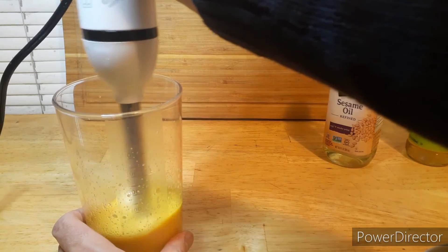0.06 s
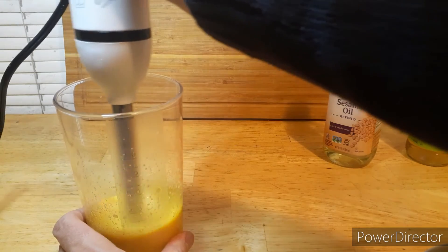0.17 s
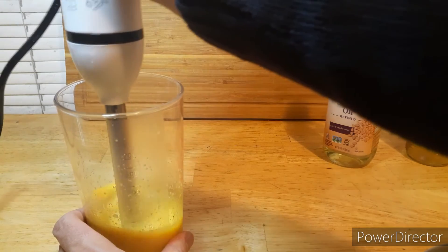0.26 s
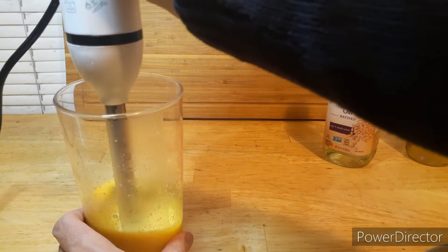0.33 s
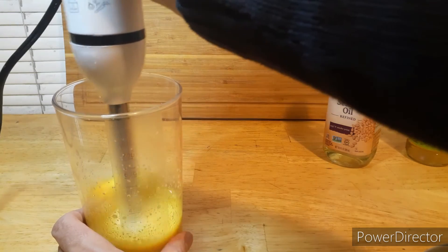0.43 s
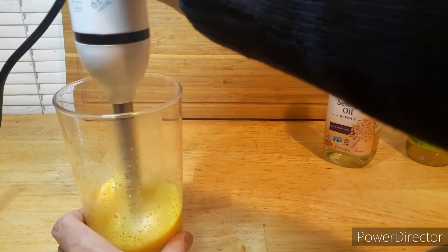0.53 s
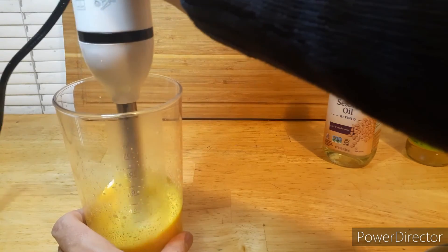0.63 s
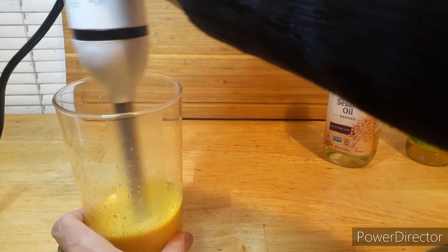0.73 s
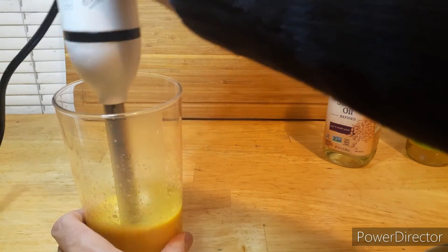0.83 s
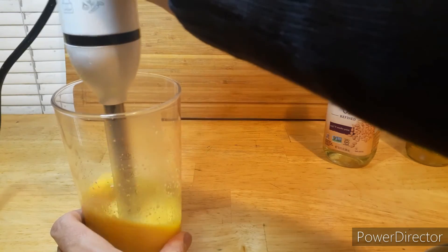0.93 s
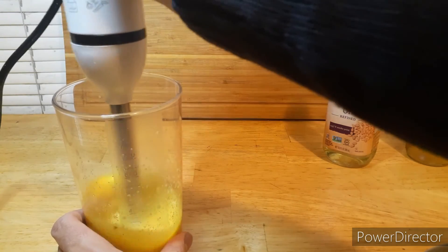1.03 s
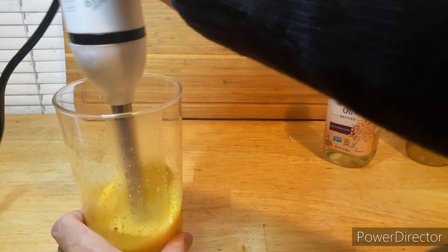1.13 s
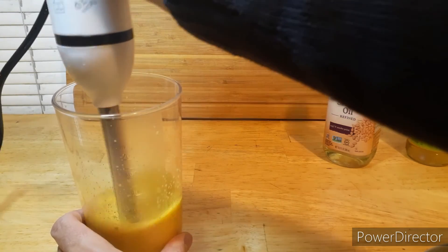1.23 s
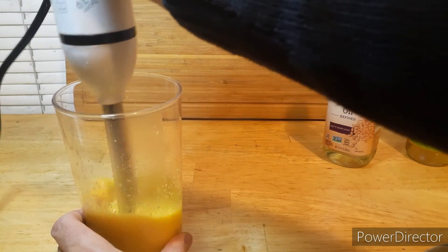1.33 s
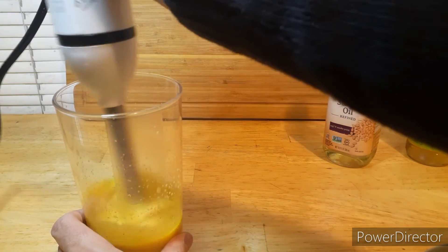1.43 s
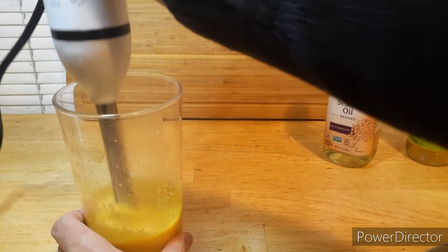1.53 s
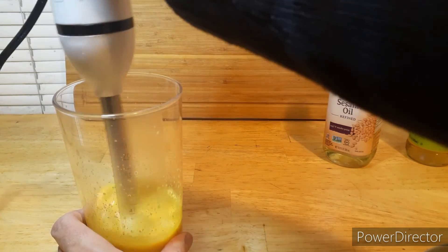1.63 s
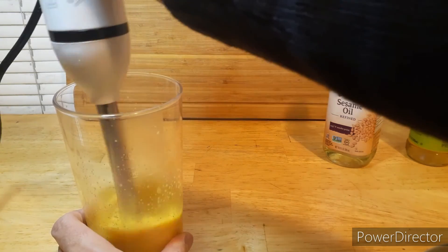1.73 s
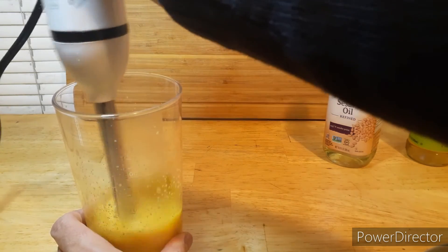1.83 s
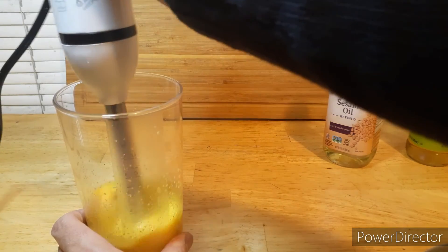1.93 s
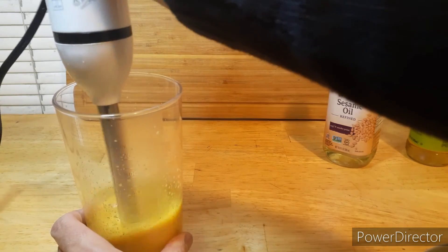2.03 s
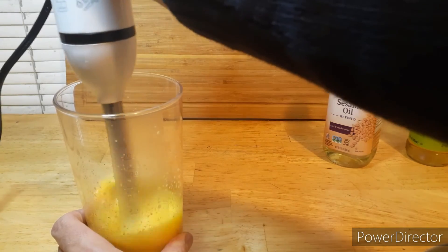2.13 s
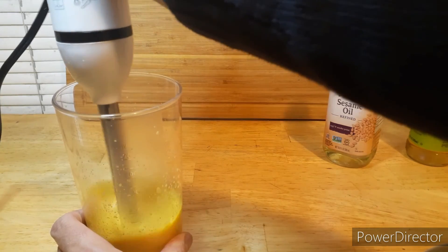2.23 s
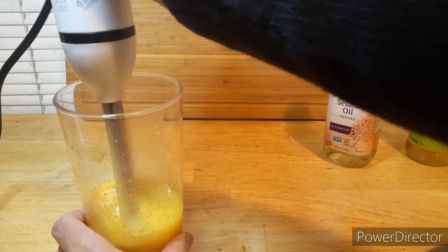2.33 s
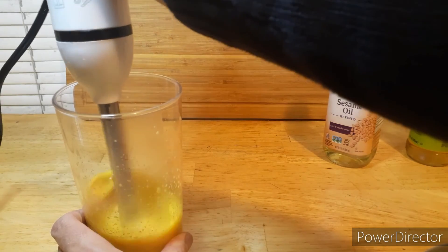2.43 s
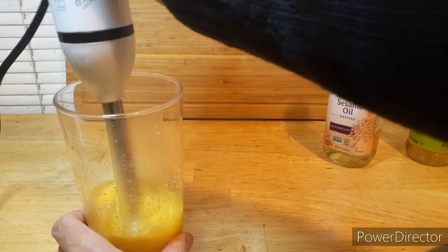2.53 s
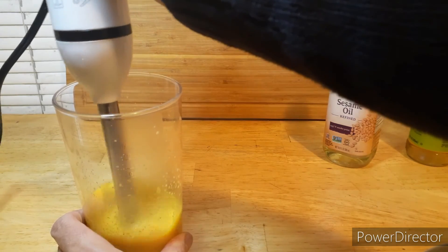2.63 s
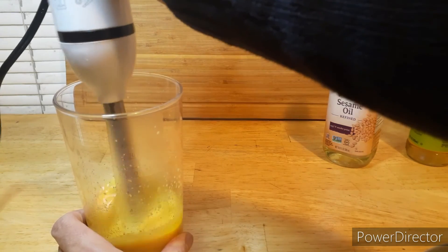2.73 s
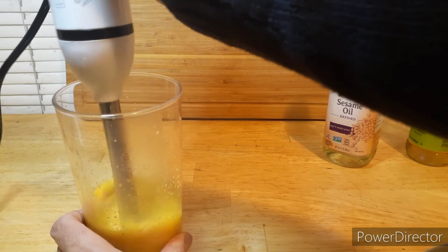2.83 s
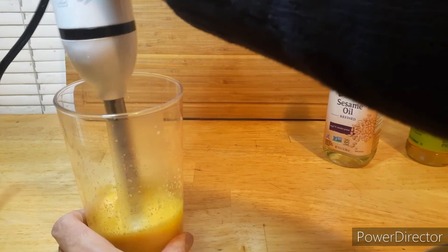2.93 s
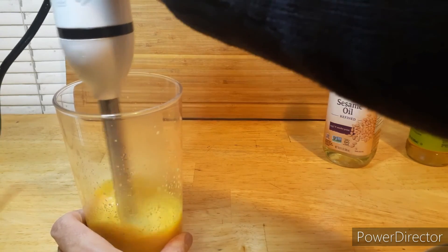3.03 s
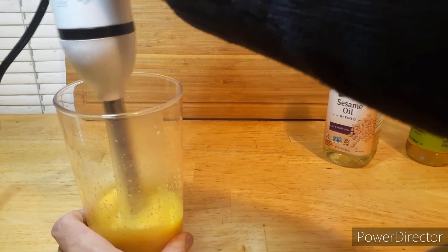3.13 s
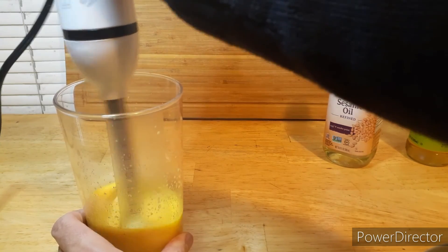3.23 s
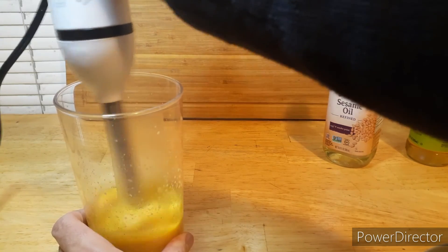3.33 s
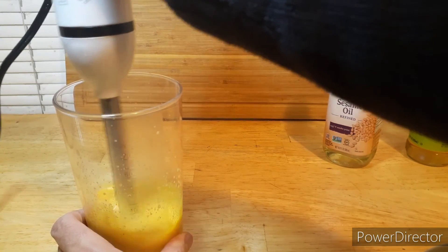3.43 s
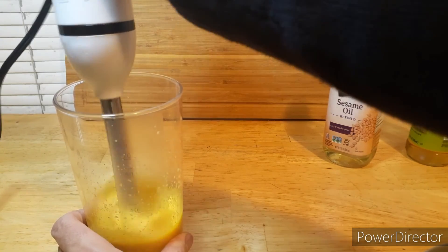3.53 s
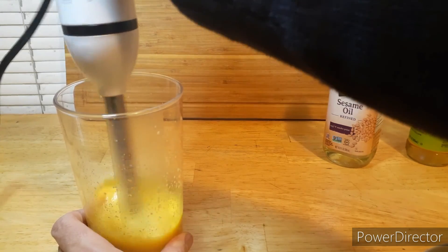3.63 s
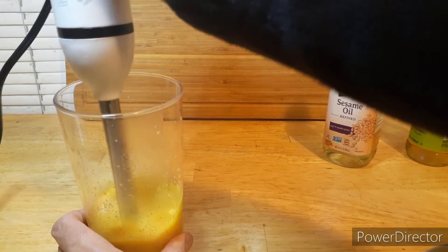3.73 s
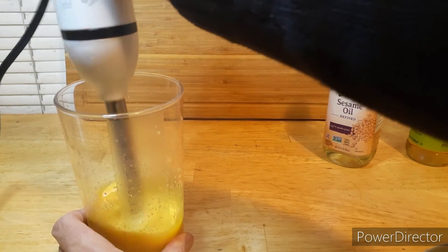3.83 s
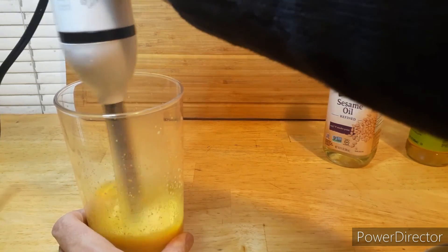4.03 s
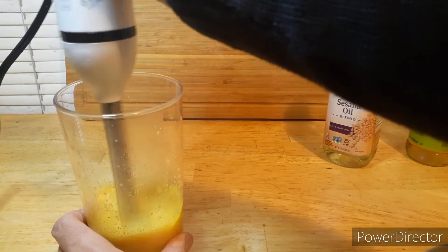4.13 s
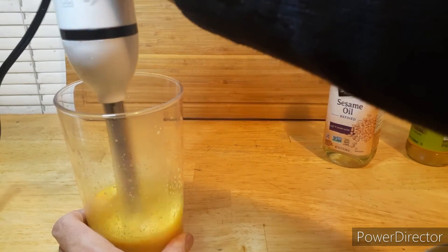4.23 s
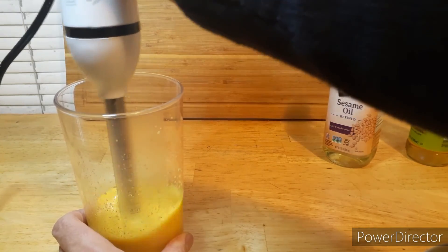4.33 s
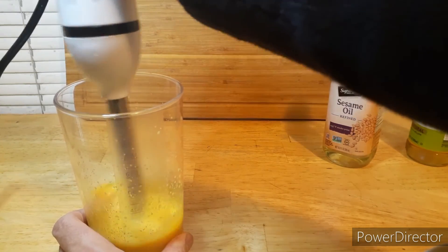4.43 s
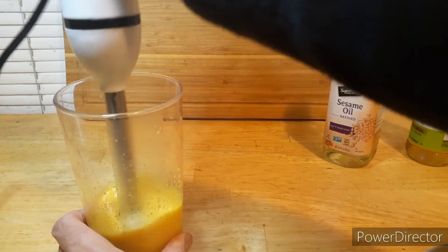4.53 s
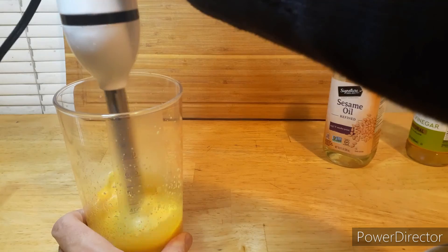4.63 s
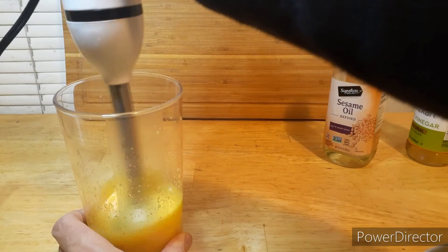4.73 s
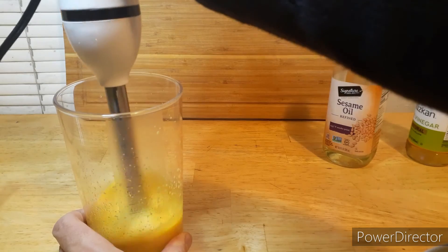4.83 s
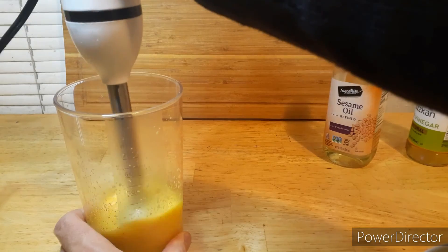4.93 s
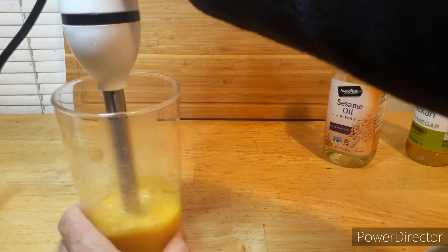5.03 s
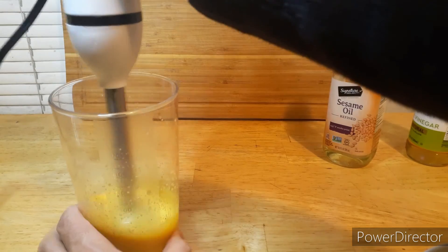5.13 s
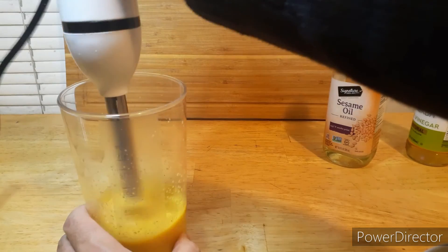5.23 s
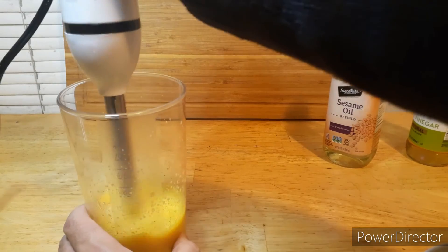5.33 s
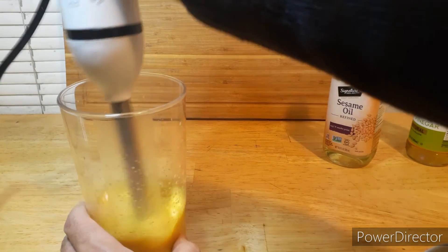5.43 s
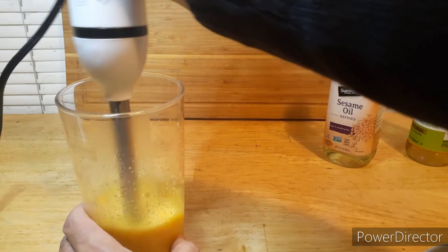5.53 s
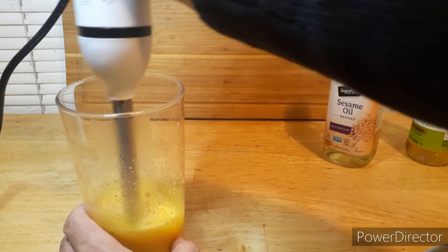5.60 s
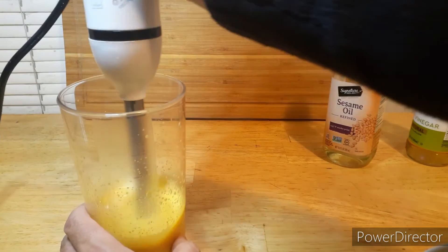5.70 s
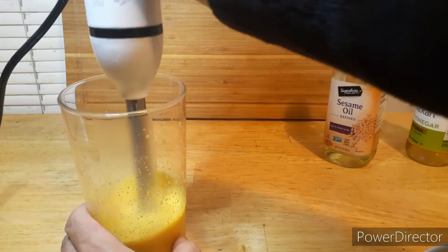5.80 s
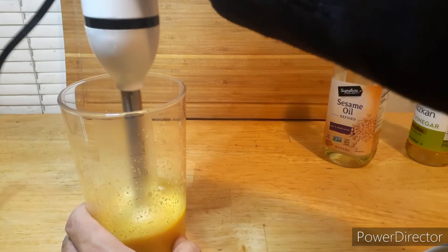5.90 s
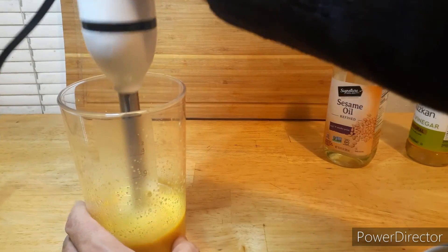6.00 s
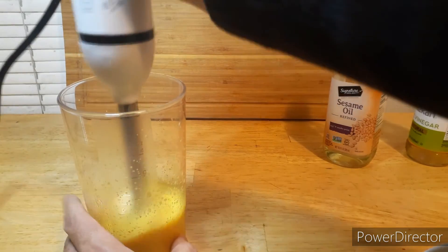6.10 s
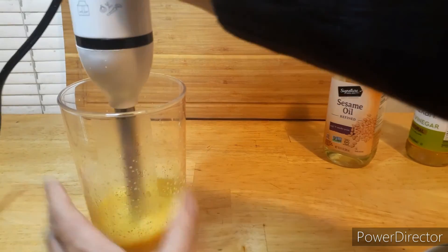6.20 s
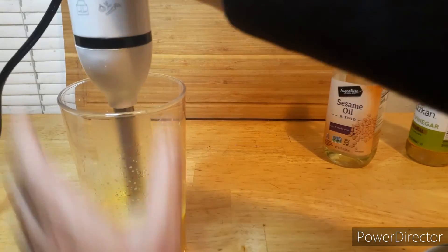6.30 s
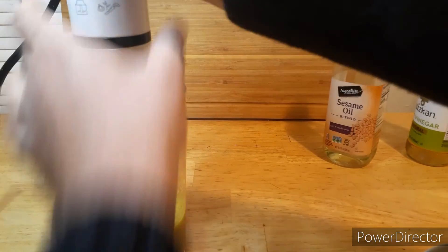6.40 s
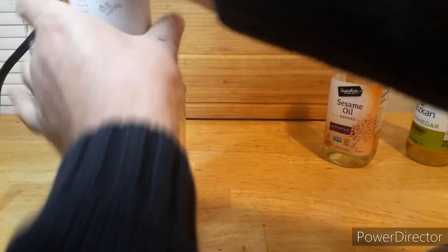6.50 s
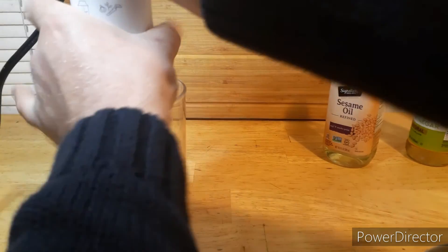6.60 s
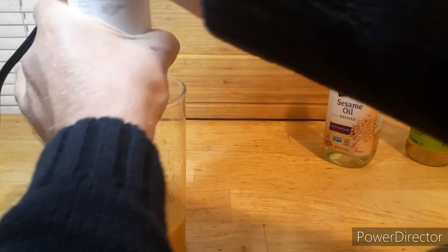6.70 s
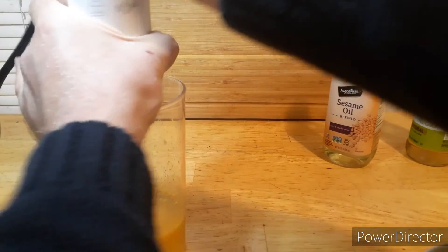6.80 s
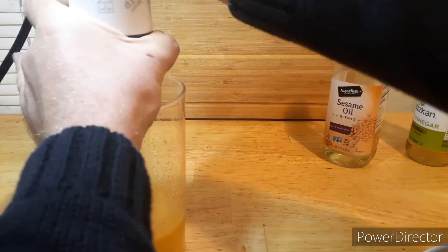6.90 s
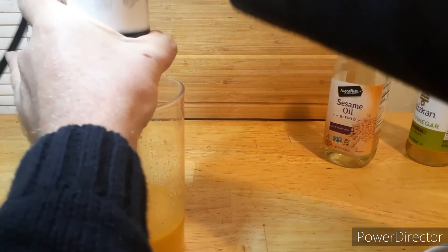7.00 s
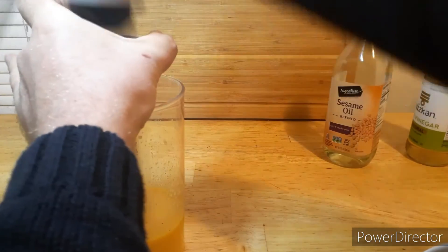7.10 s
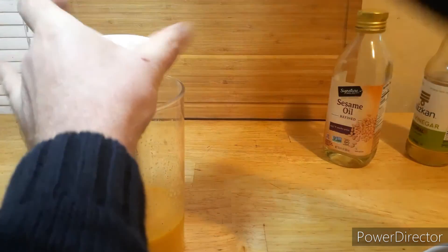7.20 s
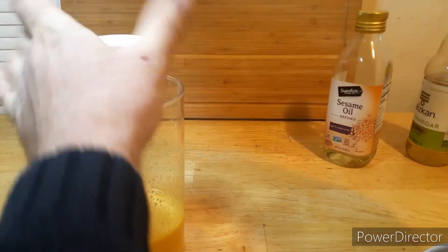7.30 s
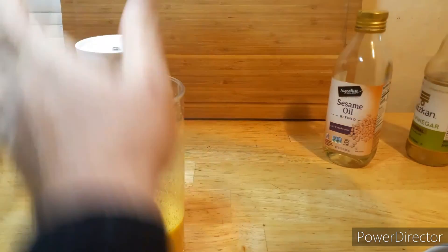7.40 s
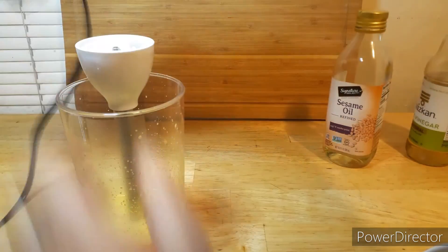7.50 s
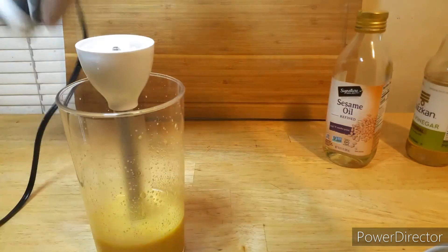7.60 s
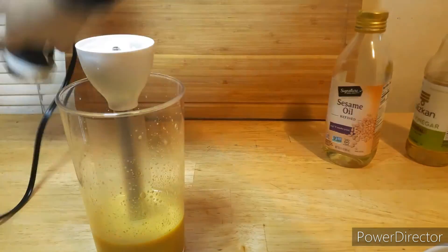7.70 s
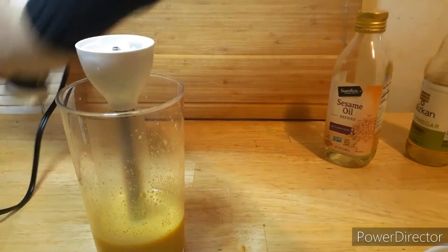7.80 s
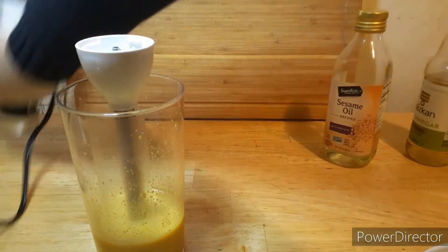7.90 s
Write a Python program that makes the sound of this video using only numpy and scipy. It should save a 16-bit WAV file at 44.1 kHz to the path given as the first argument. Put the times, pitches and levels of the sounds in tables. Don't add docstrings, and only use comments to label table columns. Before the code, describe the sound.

A hand blender roars steadily, its whirring motor mixed with a throaty hollow gurgle from the cup and frequent glugs of swallowed air. Splashes tick the wall around the middle. Near five seconds the churn thins, returns, and the motor spins down in pitch over about a second. Then near-quiet, close soft thumps, plastic clacks, and a faint rubbery cord drag in a small dry room.

```python
import sys
import numpy as np
from scipy import signal
from scipy.fft import rfft, irfft, next_fast_len
from scipy.io import wavfile
from scipy.ndimage import map_coordinates

SR = 44100
rng = np.random.default_rng(int(sys.argv[2]) if len(sys.argv) > 2 else 0)


def attenuation_scalar(level_db):
    decades = np.asarray(level_db, float) / 20
    return 10 ** decades


def master_out(mix):
    frames = np.transpose(np.atleast_2d(mix))
    ceiling = np.clip(frames, -1, 1)
    pcm = np.round(ceiling * 32767).astype(np.int16)
    wavfile.write(sys.argv[1], SR, pcm)


N = 350576

# (time [s], speed [turns/s])
SHAFT_SPEED = [(0, 209.2), (0.6, 209.3), (0.75, 210.2), (0.93, 209.1), (1.22, 209.2), (1.35, 210.1),
               (1.6, 209.7), (1.9, 208.3), (2.0, 207.2), (2.15, 207.8), (2.65, 208.5), (3.3, 207.8),
               (4.3, 207.2), (4.65, 208.9), (4.82, 210.3), (5.12, 209.8), (5.3, 208.7), (5.36, 207.2)]
# (time [s], churn level [dB])
BITE_DEPTH = [(0, -2.5), (.47, 1.5), (.75, -2.5), (1.15, -0.5), (1.4, -7.5), (1.69, -2), (1.9, 1.5),
              (2.2, 0.4), (2.6, -2), (3.3, 0.6), (3.7, 3.5), (4.3, 0.5), (4.62, 4), (4.92, -18),
              (5.15, -15.5), (5.36, -4), (5.6, 0.3)]

# (frequency [Hz], width [Hz], level [dB])
COUNTER_MODES = [(60, 4.4, -22.5), (150, 27.2, -3), (198.7, 17.3, 1), (242.5, 36.4, -10.5)]
CUP_AIR_MODES = [(376, 132, -14.5), (546, 52, -4), (588.6, 26.6, 5.5), (605.3, 25, 5), (719, 59, -10),
                 (821, 43, -11.5), (933, 20.6, -11), (999, 9.3, -8.5), (1089, 81, -11)]
CUP_WALL_MODES = [(1436, 426, -3.5), (1810, 276, -1), (2300, 17, -1.5), (2900, 470, -7.5)]
BLADE_MODES = [(404.7, 62, 0)]
# (frequency [Hz], width [Hz], level [dB])
OPEN_COLUMN_MODES = [(630, 21, 0)]

# (time [s], swell [dB], half length [s])
LIQUID_SURGES = [(.43, 1, 0.031), (.74, 0, 0.028), (.79, 3, 0.037), (.9, -2, 0.048), (.96, 3.5, 0.061),
                 (1.25, 7.5, 0.046), (1.36, 1, 0.031), (1.49, 4.5, 0.065), (2.84, 3.5, 0.036),
                 (3.0, 2.5, 0.02), (3.79, 3, 0.021), (4.35, 12, 0.017), (4.39, -7.5, 0.043),
                 (4.52, 6.5, 0.014), (4.585, -10.5, 0.058), (4.63, 5.5, 0.015), (4.68, -5, 0.014),
                 (5.06, 12, 0.037), (5.17, 9, 0.019), (5.24, 8, 0.017), (5.37, 7, 0.059), (5.43, -2, 0.027),
                 (5.54, 1, 0.09), (.06, 1.5, 0.12), (1.65, -0.5, 0.066), (2.72, 1.5, 0.049),
                 (3.68, -3.5, 0.064), (5.88, -0.5, 0.027), (6.1, -1.5, 0.051), (6.28, 4, 0.07),
                 (6.47, 2, 0.11), (6.6, 0, 0.029)]
# (time [s], swell [dB], half length [s])
GUARD_SHOVES = [(0, 8, 0.071), (.43, 7.5, 0.09), (.65, 11.5, 0.029), (.76, 7, 0.054), (.98, 11.5, 0.079),
                (1.25, 12, 0.036), (1.34, 5.5, 0.033), (1.49, 12, 0.13), (2.14, 8, 0.015),
                (2.22, -9, 0.024), (2.82, 5.5, 0.76), (3.06, 0.5, 0.033), (3.28, 0, 0.026),
                (4.52, 5.5, 0.071), (4.63, -4, 0.018), (4.68, 4.5, 0.068), (4.8, 8, 0.053),
                (5.02, 10, 0.033), (5.26, 10.5, 0.12), (5.5, 6.5, 0.061), (5.545, -13, 0.017),
                (6.07, -21, 0.042), (6.13, 7, 0.13)]
# (time [s], swell [dB], half length [s])
BLADE_SINGING = [(0, 15, 0.034), (.32, 6.5, 0.13), (.65, -13, 0.023), (.95, 3, 0.066), (1.14, -28, 0.06),
                 (1.26, 12, 0.035), (1.68, 7, 0.05), (1.85, 10.5, 0.13), (2.09, 7, 0.019),
                 (2.33, 6.5, 0.17), (2.65, -14, 0.043), (2.75, 8, 0.14), (2.92, 8.5, 0.25), (3.4, 6, 0.098),
                 (3.8, 1.5, 0.1), (4.35, 14.5, 0.044), (4.4, -19, 0.026), (4.46, 10.5, 0.017),
                 (4.63, 10.5, 0.032), (5.17, 11, 0.024), (5.37, 7, 0.044), (5.52, 17, 0.099),
                 (5.66, -17, 0.12)]

# (time [s], peak [dB], note of the air column [Hz])
AIR_GULPS = [(0.038, -6.5, 575), (0.103, -19, 620), (0.247, -5, 597), (0.389, 0.5, 568), (0.452, -19, 590),
             (0.499, -23, 630), (0.526, -9, 564), (0.558, -5, 610), (0.767, -10, 600), (0.974, -7, 616),
             (1.005, 1, 585), (1.235, -8, 600), (1.284, -11, 595), (1.522, -8, 630), (1.626, -14, 583),
             (1.72, -5.5, 605), (1.831, -8, 630), (1.944, -6, 563), (2.009, -3.5, 583), (2.107, -7.5, 630),
             (2.237, -15, 550), (2.288, -6, 583), (2.422, -3, 587), (2.466, -6, 600), (2.545, -12, 600),
             (2.628, -2, 611), (2.712, -9, 588), (2.826, -6, 572), (2.864, -0.5, 610), (2.953, -3.5, 608),
             (2.99, -2, 600), (3.079, -12, 610), (3.129, -3, 572), (3.246, -2.5, 600), (3.338, -5.5, 620),
             (3.439, -7.5, 580), (3.497, -7, 605), (3.561, -10, 564), (3.617, 3, 608), (3.649, -7.5, 628),
             (3.704, -8, 612), (3.787, -12, 634), (3.846, -10, 583), (3.992, -2, 590), (4.145, 2.5, 596),
             (4.184, -5, 600), (4.286, -2.5, 587), (4.342, -1.5, 577), (4.41, -5.5, 567), (4.444, -10, 605),
             (4.475, -7, 600), (4.509, -16, 600), (4.694, -10, 600), (5.233, -16, 643), (5.297, -10, 684),
             (5.341, -9.5, 595), (5.462, -2.5, 600), (5.557, -2, 593)]
# (frequency [Hz], level [dB], t60 [s])
GULP_NOTES = [(588, 5, 0.062), (400.5, -4, 0.048), (1056, -6, 0.038), (785, -8.5, 0.062)]

# (frequency [Hz], level [dB per Hz])
HISS_COLOUR = [(1200, -7), (1950, -9.5), (2300, -3.5), (3000, -16), (3450, -11), (4250, -7), (5700, -12),
               (8600, -14.5), (10200, -14), (15400, -29)]
# (frequency [Hz], level [dB])
HOUSING_COLOUR = [(150, -62), (600, -52), (1050, -49), (1450, -51), (1900, -56), (2800, -62), (4200, -62),
                  (6400, -60), (9800, -60), (11500, -67), (13000, -72), (15400, -84)]
# (multiple of shaft speed, extra level [dB])
POWERED_ORDERS = [(6, 2), (7, 6), (9, 3), (20, 5), (24, 7), (26, 4), (27, 5), (29, 5), (30, 10), (31, 10),
                  (32, 7), (36, 5), (37, 6), (39, 6), (42, 6), (45, 6), (47, 4), (48, 5), (54, 7), (60, 6),
                  (61, 5)]
# (multiple of shaft speed, extra level [dB])
COASTING_ORDERS = [(24, 19), (36, 10), (45, 5), (48, 13), (49, 6), (51, 7), (60, 10), (62, 9), (64, 5),
                   (66, 9), (67, 6), (72, 12), (74, 6), (78, 7), (79, 6), (81, 7), (83, 7), (84, 9),
                   (96, 12), (97, 7), (108, 8), (120, 8)]
# (frequency [Hz], width [Hz], level [dB])
SHELL_MODES = [(4050, 450, 0), (5150, 400, 0), (6400, 500, 2.5), (7500, 600, -2), (8900, 700, -2.5),
               (10100, 700, -9)]
# (time [s], swell [dB], half length [s])
HISS_SWELLS = [
    (.3, 3.5, 0.22),
    (1.6, -4.5, 0.22),
    (5.05, -4, 0.29),
    (5.72, 1.5, .1),
]

# (time [s], peak [dB], length [s], low
# edge [Hz])
WALL_SPRAY = [(1.22, -23, 0.041, 1420), (1.221, -33, 0.035, 3500), (1.317, -31.5, 0.052, 1720),
              (2.121, -36, 0.011, 5300), (2.243, -37.5, .018, 6000), (2.539, -35.5, 0.0061, 4600),
              (3.073, -39, 0.0081, 4300), (3.581, -30.5, 0.041, 2200), (3.748, -30.5, 0.05, 2590),
              (3.806, -35.5, 0.04, 3640), (3.881, -33, 0.01, 2700), (3.934, -32, .012, 2900),
              (4.157, -36.5, 0.048, 4180), (4.348, -24.5, 0.035, 1300), (4.475, -39, 0.03, 3780),
              (4.5, -29, 0.011, 2390), (4.53, -32, 0.019, 2100), (4.631, -26, 0.013, 1320),
              (4.696, -25.5, 0.019, 2160), (5.32, -42, 0.013, 2300), (5.352, -39, 0.028, 5200),
              (7.047, -56, 0.0067, 1550), (7.366, -60, 0.03, 2600), (7.508, -42, .012, 2200),
              (7.52, -51, 0.065, 1300), (.203, -50, .02, 8000), (7.914, -56, 0.051, 3970)]
# (time [s], peak [dB], length [s], low edge [Hz])
WET_SLAPS = [(3.536, -31, 0.12, 2300), (4.337, -28, 0.022, 2300), (4.433, -38, .015, 2550),
             (4.618, -43, .02, 7600), (4.749, -34, 0.031, 3300), (4.796, -35, .022, 3750),
             (6.709, -42.5, 0.0072, 1650), (6.894, -55, .0059, 1900), (7.087, -52, 0.059, 760),
             (7.26, -68, 0.0095, 2150), (7.51, -45, 0.07, 1540), (7.666, -58, .01, 8500),
             (7.746, -49, .018, 3300), (5.53, -40, 0.065, 2500), (7.65, -62, .04, 2100)]
# (time [s], peak [dB], frequency [Hz])
DROPLETS = [(1.218, -29, 8270), (1.225, -30, 2060), (1.227, -38, 5860), (1.228, -34, 8200),
            (1.237, -19, 2670), (1.242, -28, 7460), (1.248, -22, 2100), (1.329, -37, 4300),
            (1.819, -28, 2300), (2.123, -26, 5970), (2.124, -40, 11710), (2.127, -37, 9070),
            (2.132, -38, 11250), (2.248, -41, 12000), (2.456, -27, 4200), (2.542, -36, 11250),
            (2.542, -25, 5800), (3.072, -37, 5940), (3.538, -21, 3160), (3.72, -34, 11020),
            (3.747, -24, 4820), (3.754, -19, 3370), (3.761, -45, 5170), (3.763, -28, 8900),
            (3.763, -27, 7600), (3.763, -20, 3600), (3.764, -36, 10220), (3.801, -34, 7200),
            (3.814, -38, 5860), (3.822, -41, 7460), (3.884, -25, 5000), (4.166, -44, 11020),
            (4.166, -44, 9880), (4.172, -29, 5600), (4.339, -28, 3330), (4.349, -15, 2800),
            (4.357, -13, 2690), (4.36, -28, 4740), (4.366, -33, 8960), (4.508, -21, 3140),
            (4.509, -33, 10340), (4.545, -18, 2660), (4.626, -34, 9300), (4.701, -20, 3330),
            (4.705, -30, 6890), (4.708, -35, 5000), (4.71, -19.5, 1960), (4.711, -27, 3200),
            (4.748, -32, 4020), (4.756, -35, 4400), (4.795, -35, 5350), (5.328, -28, 3680),
            (5.328, -32, 4700), (5.36, -38, 11710), (5.36, -32, 3900), (5.361, -23, 1830),
            (5.396, -39, 11250), (5.397, -36, 4710)]

# (time [s], thud [dB], thud [Hz], click [dB])
CUP_KNOCKS = [(1.93, -21, 60, -60), (6.114, -17, 69.4, -59), (6.139, -11, 160, -50), (6.676, -31, 169, -64),
              (6.71, -44, 180, -43), (6.739, -27.5, 176, -42), (6.794, -20, 180, -65),
              (6.879, -28, 168, -50), (6.896, -54.5, 179, -55), (6.918, -30, 150, -67),
              (7.044, -25, 193, -47), (7.073, -16, 201, -31), (7.093, -17, 179, -38),
              (7.389, -16.5, 150, -26.5), (7.401, -13.5, 235, -33), (7.448, -21.5, 240, -35),
              (7.509, -60, 224, -51), (7.515, -15.5, 225, -29), (7.716, -20.5, 61.5, -65),
              (7.729, -28, 206, -70), (7.751, -32, 150, -56), (7.799, -36, 87.4, -72)]
# (time [s], level [dB], frequency [Hz],
# t60 [s])
PLASTIC_RINGS = [(7.076, -37, 517, .06), (7.077, -41, 915, 0.091), (7.105, -41, 896, 0.14),
                 (7.391, -31, 2355, 0.13), (7.39, -33.5, 2290, 0.032), (7.393, -18, 420, 0.042),
                 (7.394, -47, 1120, 0.077), (7.449, -43, 1000, .05), (7.513, -26, 420, 0.064),
                 (7.512, -43, 1030, 0.074), (7.512, -41, 1480, .07), (7.76, -35, 1480, .025)]
# (time [s], level [dB])
CORD_DRAG = [
    (7.72, -72),
    (7.744, -58),
    (7.75, -57),
    (7.772, -48),
    (7.795, -44.5),
    (7.83, -51),
    (7.88, -49.5),
    (7.91, -52),
    (7.95, -50),
]
# (frequency [Hz], width [Hz], level [dB])
CORD_SCRAPE_MODES = [(2300, 230, 11.5), (1900, 500, -2), (2940, 300, 4), (600, 310, 5.5), (4800, 1800, -9),
                     (9500, 3000, -20), (6650, 500, -14)]
# (frequency [Hz], width [Hz], level [dB])
CORD_WALL_MODES = [(1480, 150, 0), (1200, 170, -6.5)]

# (time [s], swell [dB], half length [s])
HAND_PRESSES = [(.37, 20, .04), (.88, 20, 0.12), (1.4, 14, 0.1), (2.06, 17, 0.24), (2.63, 14, 0.23),
                (3.1, -18, .14), (3.56, -16, 0.023), (3.9, 17, 0.045), (4.04, 17, .05), (4.25, 19, 0.1),
                (4.54, -19, 0.11), (4.8, 12, 0.045), (5.05, 15.5, 0.068), (5.35, -12, 0.05),
                (5.7, 16, 0.13), (6.15, 24, 0.056), (.1, -6, .15), (4.7, -8, .05), (5.55, 8, .06),
                (6.32, 12.5, 0.073), (7.08, 14, .06), (7.4, 14, .05), (7.57, -8, .06)]
# (frequency [Hz], level [dB])
ROOM_COLOUR = [(15, -39.5), (25, -32), (49, 5), (139, -7), (278, -15), (462, -15.5), (637, -23.5),
               (903, -22), (1500, -33), (12400, -45), (15000, -51)]

SWITCH_OFF_S = 5.53
FULL_TURNS = 208


def unit(x):
    return x / np.sqrt(np.mean(x ** 2) + 1e-20)


def seconds(length_s=N / SR):
    return np.arange(round(length_s * SR)) / SR


def place(out, s, sound):
    out[round(s * SR):][:len(sound)] += sound


def in_time(rows):
    s, *columns = np.transpose(rows)
    return [np.interp(seconds(), s, column) for column in columns]


def swells(rows):
    t = np.arange(0, N + 64, 64) / SR
    level_db = sum(db * np.exp(-((t - s) / half) ** 2) for s, db, half in rows)
    return np.interp(seconds(), t, level_db)


def drift(rate):
    r = np.exp(-80 * np.pi * rate / SR)
    noise = rng.standard_normal(N // 40 + 2002)
    slow = signal.lfilter([1], [1, -2 * r, r * r], noise)[2000:]
    return np.interp(np.arange(N) / 40, np.arange(len(slow)), unit(slow))


def band(x, low_hz, high_hz):
    sos = signal.butter(3, [low_hz, min(high_hz, .45 * SR)], "band", fs=SR, output="sos")
    return signal.sosfilt(sos, x)


def colour(x, spectrum):
    hz, level_db = np.transpose(spectrum)
    size = next_fast_len(N)
    grid = np.log(np.arange(size // 2 + 1) * SR / size + 1)
    gain = attenuation_scalar(np.interp(grid, np.log(hz), level_db))
    return unit(irfft(rfft(x, size) * gain, size)[:N])


def resonate(x, modes, flicker_db, rate=2.8):
    out = 0
    for k, (hz, width, level_db) in enumerate(modes):
        r = np.exp(-np.pi * width / SR)
        drive = x * attenuation_scalar(level_db + flicker_db * drift(rate))
        poles = [1, -2 * r * np.cos(2 * np.pi * hz / SR), r * r]
        out = out + (-1) ** k * signal.lfilter([1 - r, 0, r - 1], poles, drive)
    return unit(out)


def shaft():
    drag_per_s, friction_turns = .775, 88.7
    turns, = in_time(SHAFT_SPEED)
    coast_s = np.maximum(seconds() - SWITCH_OFF_S, 0)
    turns = (turns + friction_turns) * np.exp(-drag_per_s * coast_s) - friction_turns
    return 2 * np.pi * np.cumsum(np.maximum(turns, 0)) / SR


def spin_db(angle, stall_turns, law):
    turns = np.gradient(angle) * SR / (2 * np.pi)
    left = (turns - stall_turns) / (FULL_TURNS - stall_turns)
    return law * 20 * np.log10(np.clip(left, 1e-4, 1))


def turbulence(angle, lumps_db, blade):
    sweep = np.cos(2 * angle + 2.0 * drift(10.4))
    double_sweep = np.cos(4 * angle + drift(50))
    push = blade * (sweep + 1.5 * double_sweep)
    return attenuation_scalar(lumps_db * drift(34.5)) * (rng.standard_normal(N) + push)


def churn(angle, boom_db, cup_db, blade_db, wall_db):
    t = seconds()
    wobble = .14 * np.clip((t - SWITCH_OFF_S) / .3, 0, 1) * (t < 6.1)
    rocking = np.cos(angle) + 1.6 * np.cos(2 * angle)
    shake = turbulence(angle, 0.97, 0) + wobble * attenuation_scalar(4.6 * drift(9.2)) * rocking
    boom = band(resonate(shake, COUNTER_MODES, 1.68), 34, 306)
    drive = turbulence(angle, 1.04, 0.052)
    cup = band(resonate(drive, CUP_AIR_MODES, 0.72), 245, 1384)
    blade = band(resonate(turbulence(angle, 0.23, 0.1), BLADE_MODES, 0), 390.0, 426.8)
    wall = band(resonate(drive, CUP_WALL_MODES, 1.0), 1200, 3600)
    layers = [(boom_db, boom), (cup_db, cup), (blade_db, blade), (wall_db, wall)]
    return sum(attenuation_scalar(level_db) * unit(layer) for level_db, layer in layers)


def open_column(angle, level_db):
    note = resonate(turbulence(angle, 1.7, 0), OPEN_COLUMN_MODES, 0)
    return attenuation_scalar(level_db) * unit(band(note, 576.0, 720))


def gulps():
    out, t = np.zeros(N), seconds(.12)
    rise = 1 - np.exp(-(t / 0.0027) ** 2)
    for s, peak_db, note_hz in AIR_GULPS:
        tune = note_hz / GULP_NOTES[0][0]
        ring = sum(attenuation_scalar(level_db - 60 * t / t60) * np.sin(2 * np.pi * hz * tune * t)
                   for hz, level_db, t60 in GULP_NOTES)
        place(out, s, attenuation_scalar(peak_db - 6.5) * ring * rise)
    return out


def turn_pattern(angle, strong, phases):
    level_db = rng.uniform(-9, 4, len(phases))
    for order, extra_db in strong:
        level_db[round(order)] = extra_db + rng.uniform(-4, 3)
    pattern = unit(irfft(phases * attenuation_scalar(level_db), 8191))
    turn = np.linspace(0, 2 * np.pi, 8192)
    return np.interp(angle % (2 * np.pi), turn, np.append(pattern, pattern[0]))


def motor(angle, air_db, whine_db):
    phases = np.exp(2j * np.pi * rng.random(125)) * (np.arange(125) > 3)
    shares = [attenuation_scalar(12 * drift(.8)) for grip in range(4)]
    powered = sum(share * turn_pattern(angle, POWERED_ORDERS, phases[:100]) for share in shares) / sum(shares)
    loose = resonate(turn_pattern(angle, COASTING_ORDERS, phases), SHELL_MODES, 4.0)
    white, flutter = rng.standard_normal(N), drift(30)
    jitter_s = 1.9e-5
    loose = map_coordinates(loose, [np.arange(N) + jitter_s * SR * flutter], mode="nearest")
    since_off = seconds() - SWITCH_OFF_S
    coasting = np.clip(since_off / .08, 0, 1)
    whine = colour((1 - coasting) * powered + coasting * loose * .8, HOUSING_COLOUR)
    hiss = colour(white * attenuation_scalar(1.2 * flutter), HISS_COLOUR)
    slowed = np.clip(since_off / 1.0, 0, 1)
    shell_hiss = resonate(rng.standard_normal(N), SHELL_MODES, 5.0)
    hiss = hiss * attenuation_scalar(-4 * slowed) + attenuation_scalar(-8 + 2 * slowed) * shell_hiss
    hiss_treble, whine_treble = [np.std(band(x[:5 * SR], 3500, 14000)) for x in (hiss, whine)]
    return attenuation_scalar(air_db) * (hiss / hiss_treble + attenuation_scalar(whine_db) * whine / whine_treble) * 0.69


def treble_swelled(x):
    sos = signal.butter(2, [3300, 6300], "band", fs=SR, output="sos")
    return x + (attenuation_scalar(swells(HISS_SWELLS)) - 1) * signal.sosfiltfilt(sos, x)


def splashes():
    out, t = np.zeros(N + SR), seconds(.16)
    events = [(*row, 2.75) for row in WALL_SPRAY] + [(*row, 1.6) for row in WET_SLAPS]
    for s, peak_db, length, low_hz, span in events:
        lumps_db = 4.1 * rng.standard_normal(len(t) // 60 + 1).repeat(60)[:len(t)]
        grains = rng.standard_normal(len(t)) * attenuation_scalar(lumps_db)
        shape = np.minimum(t / (0.057 * length), 1) * np.exp(-(t / length) ** 2)
        mist = unit(band(grains, low_hz, 12500))
        wet = unit(band(grains, low_hz, span * low_hz)) + 0.26 * mist
        place(out, s, attenuation_scalar(peak_db - 2.5) * shape * wet)
    return out[:N]


def drops():
    rise_s, t60_s, climb_per_s = .0015, .022, 6.0
    out, t = np.zeros(N), seconds(.05)
    rise = 1 - np.exp(-(t / rise_s) ** 2)
    for s, peak_db, hz in DROPLETS:
        ring = np.sin(2 * np.pi * hz * t * (1 + climb_per_s * t)) * rise
        place(out, s - rise_s, attenuation_scalar(peak_db + 2.0 - 60 * t / t60_s) * ring)
    return out


def knocks():
    t60_s, hold_s = 0.13, 0.051
    out, t = np.zeros(N + SR), seconds(.4)
    click_shape = (attenuation_scalar(-60 * t / .035) + attenuation_scalar(-13 - 60 * t / .2)) * (1 - np.exp(-t / .0015))
    for s, thud_db, hz, click_db in CUP_KNOCKS:
        fade = attenuation_scalar(thud_db - 60 * t / t60_s * (hz / 200) ** 0.29)
        stilled = np.exp(-(t * hz / 200 / hold_s) ** 4)
        thud = fade * np.sin(2 * np.pi * hz * t) * (1 - np.exp(-(t / 0.0022) ** 2)) * stilled
        body = unit(band(rng.standard_normal(len(t)), 163, 1000))
        edge = unit(band(rng.standard_normal(len(t)), 1000, 6800))
        place(out, s, thud + attenuation_scalar(click_db) * (body + 0.24 * edge) * click_shape)
    return out[:N]


def rings():
    out, t = np.zeros(N + SR), seconds(.4)
    for s, ring_db, hz, t60 in PLASTIC_RINGS:
        place(out, s, attenuation_scalar(ring_db - 60 * t / t60) * np.sin(2 * np.pi * hz * t))
    return out[:N]


def cord():
    level_db, = in_time([(7.7, -100), *CORD_DRAG])
    grains = rng.standard_normal(N) * attenuation_scalar(2.2 * drift(140))
    wall_db = -2.0 - 54 * np.clip(seconds() - 7.84, 0, 1)
    scrape = resonate(grains, CORD_SCRAPE_MODES, 2.7, rate=22.0)
    wall = resonate(grains, CORD_WALL_MODES, 3.1, rate=19.0)
    return attenuation_scalar(level_db) * (scrape + attenuation_scalar(wall_db) * wall)


def rumble():
    let_go_db = -27 * np.clip((seconds() - 7.1) / 0.076, 0, 1)
    level_db = -48.5 + swells(HAND_PRESSES) + let_go_db
    return attenuation_scalar(level_db) * unit(band(rng.standard_normal(N), 33, 104))


def kitchen(x):
    t60_s, t = .25, seconds(.5)
    reply = band(rng.standard_normal(len(t)), 450, 7000) * attenuation_scalar(-60 * t / t60_s) * (t > .006)
    return signal.fftconvolve(x, reply / np.sqrt(np.sum(reply ** 2)))[:N]


def room_air():
    return attenuation_scalar(-46) * colour(rng.standard_normal(N), ROOM_COLOUR)


def scene():
    angle, (bite_db,), surge_db = shaft(), in_time(BITE_DEPTH), swells(LIQUID_SURGES)
    churn_db = bite_db + spin_db(angle, stall_turns=26, law=1.38)
    fan_db = spin_db(angle, stall_turns=21.4, law=0.7)
    choke_db = swells([(s - .005, -1.5, 0.013) for s, peak_db, note_hz in AIR_GULPS])
    liquid = churn(angle,
                   boom_db=-24.5 + 0.66 * churn_db + swells(GUARD_SHOVES),
                   cup_db=-17 + 1.21 * churn_db + surge_db + choke_db,
                   blade_db=-32 + 1.03 * churn_db + swells(BLADE_SINGING),
                   wall_db=-32.5 + 0.96 * churn_db + 0.66 * surge_db)
    liquid = liquid + gulps()
    whine_db = -4.3 - .17 * bite_db + .2 * fan_db
    drive = treble_swelled(motor(angle, -37.5 + 0.081 * bite_db + fan_db, whine_db)) + rumble()
    air = room_air()
    open_db = -24 + 0.36 * bite_db + spin_db(angle, stall_turns=46, law=.95) + surge_db
    liquid = liquid + open_column(angle, open_db)
    hits = cord() + knocks() + drops() + splashes()
    return (liquid + drive + hits + rings() + attenuation_scalar(-17) * kitchen(hits) + air)[None]


def top_cut(x):
    return signal.sosfilt(signal.butter(12, 15540, fs=SR, output="sos"), x)


def record(dry):
    mix = dry / (1 + dry ** 6) ** (1 / 6)
    return top_cut(mix)


dry = scene()
out = record(dry)
master_out(out)
```